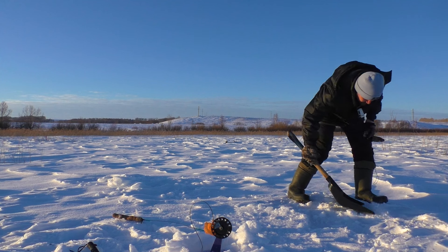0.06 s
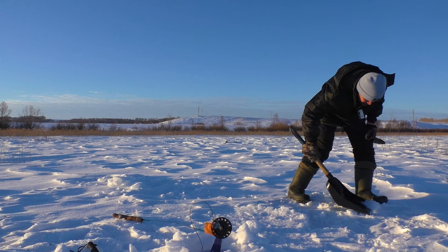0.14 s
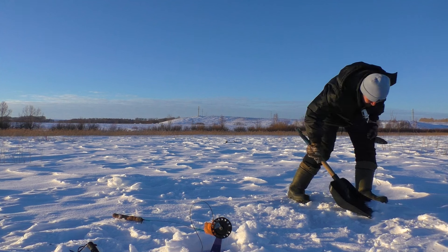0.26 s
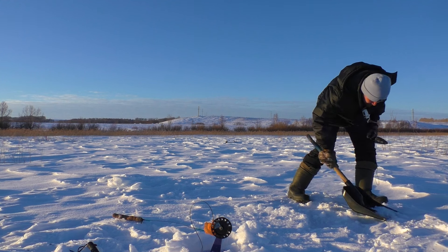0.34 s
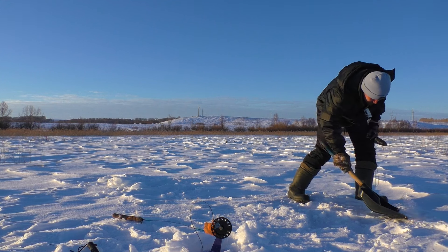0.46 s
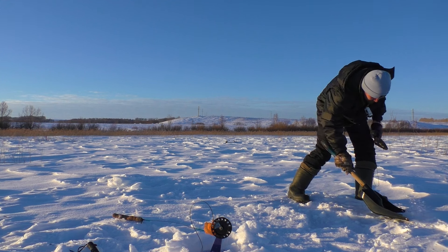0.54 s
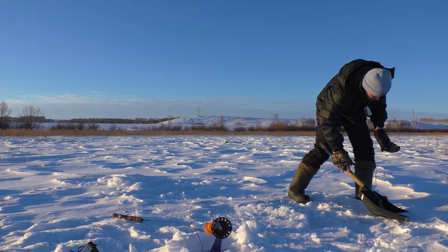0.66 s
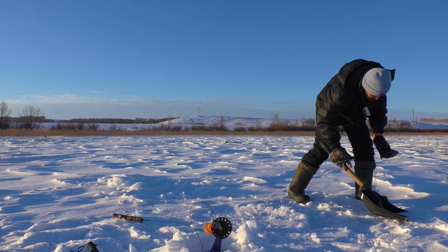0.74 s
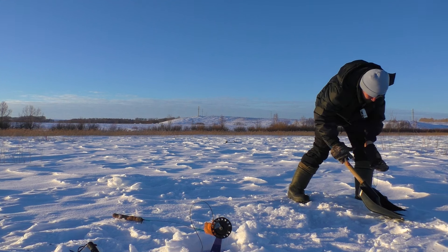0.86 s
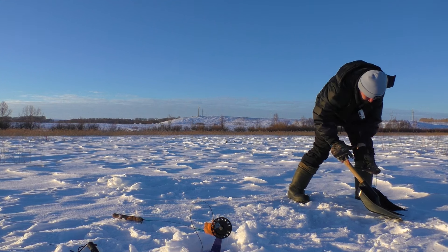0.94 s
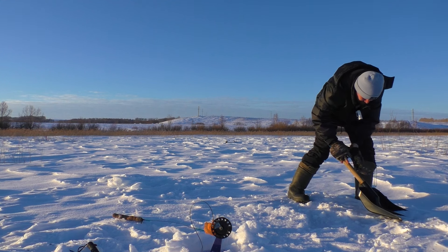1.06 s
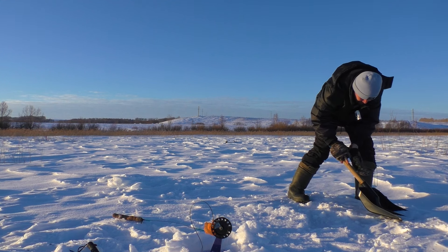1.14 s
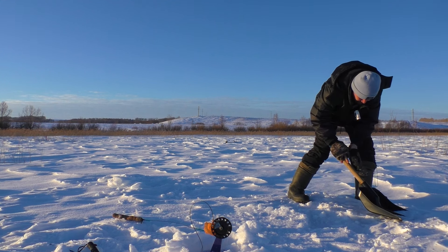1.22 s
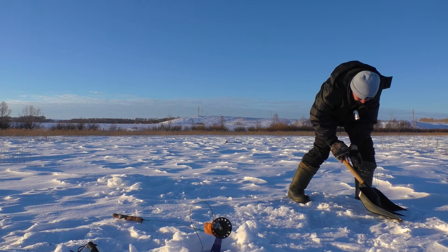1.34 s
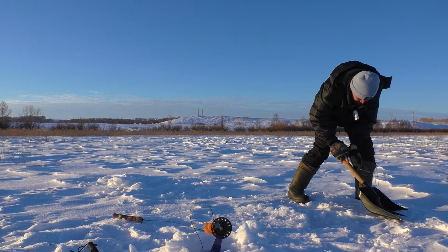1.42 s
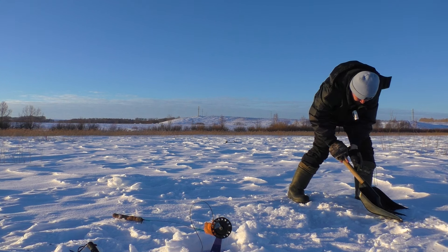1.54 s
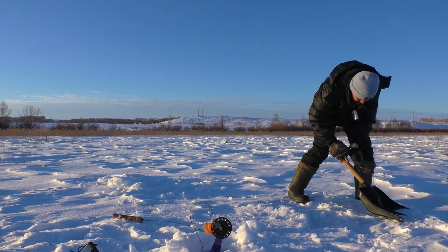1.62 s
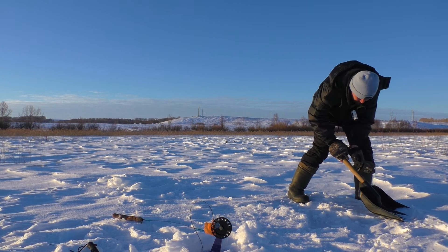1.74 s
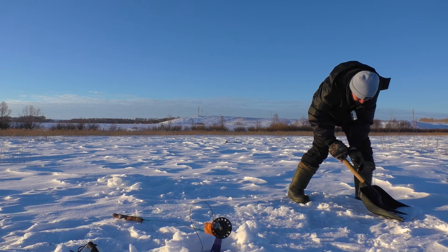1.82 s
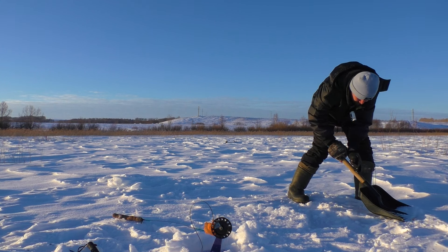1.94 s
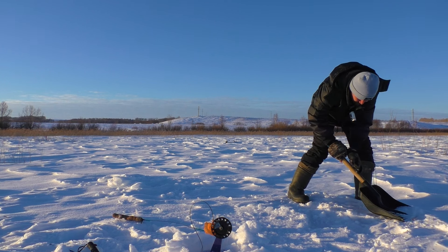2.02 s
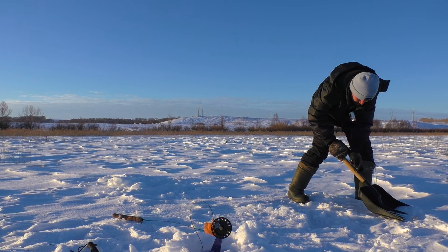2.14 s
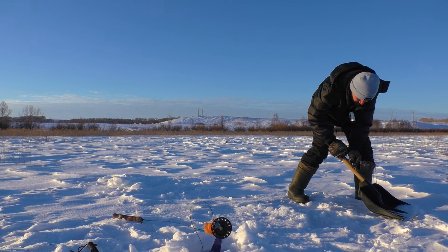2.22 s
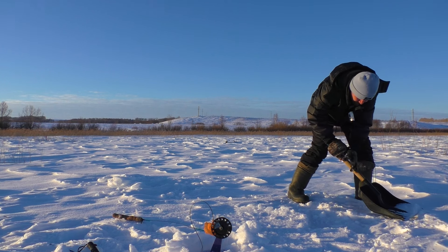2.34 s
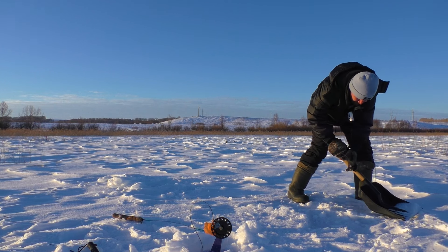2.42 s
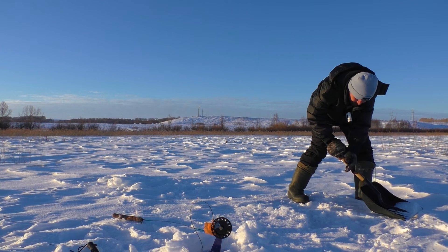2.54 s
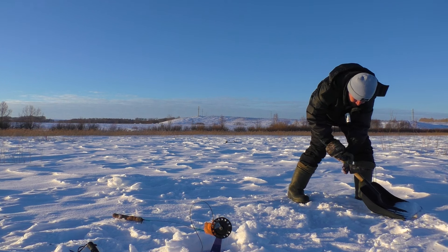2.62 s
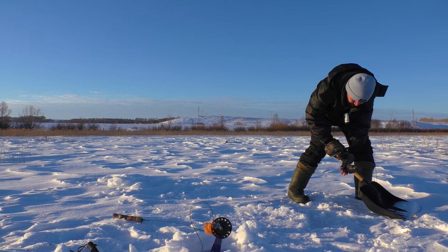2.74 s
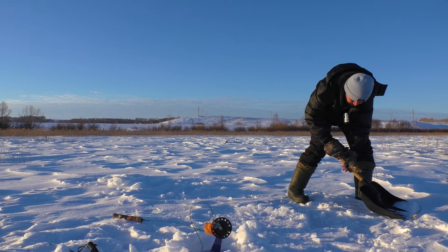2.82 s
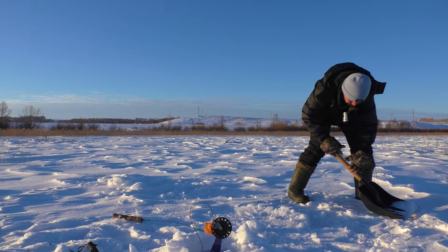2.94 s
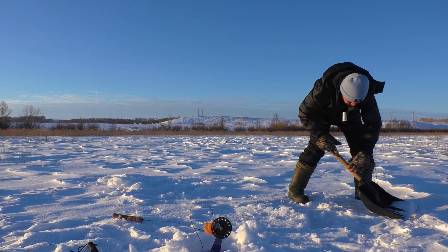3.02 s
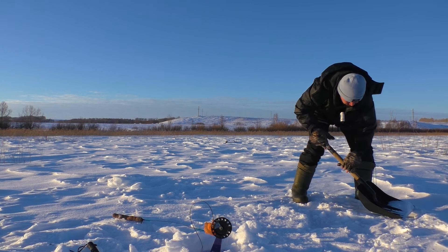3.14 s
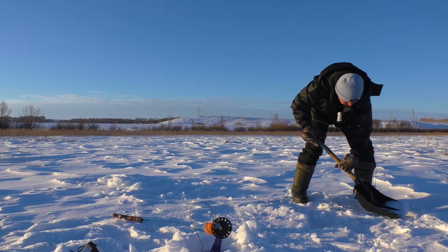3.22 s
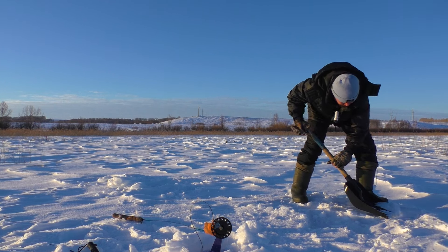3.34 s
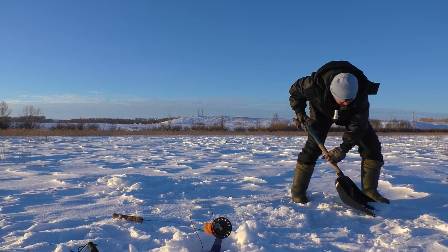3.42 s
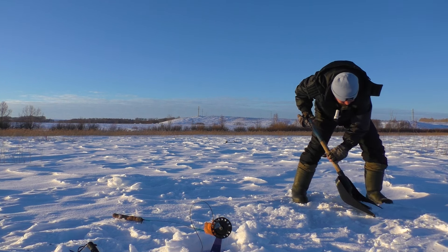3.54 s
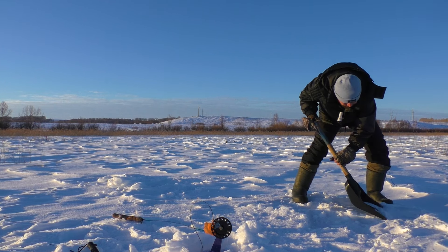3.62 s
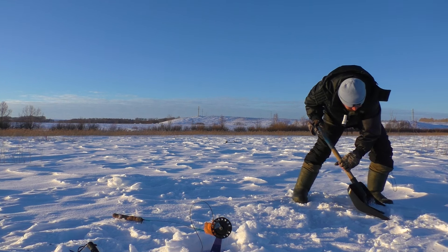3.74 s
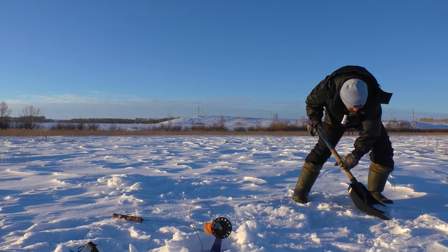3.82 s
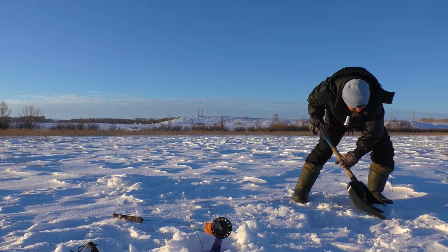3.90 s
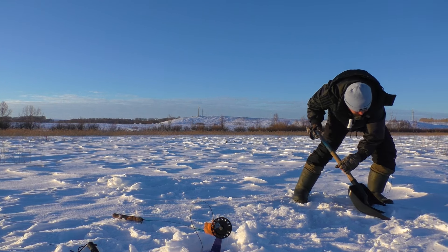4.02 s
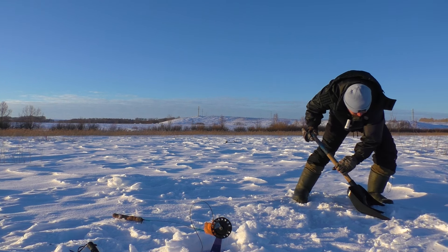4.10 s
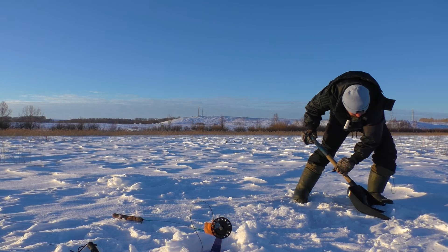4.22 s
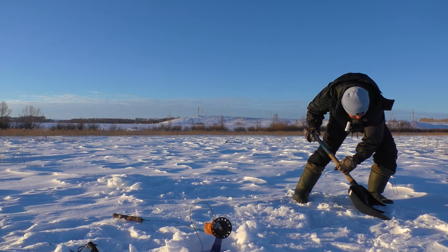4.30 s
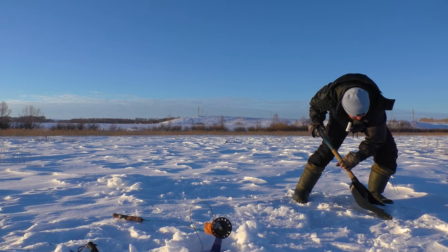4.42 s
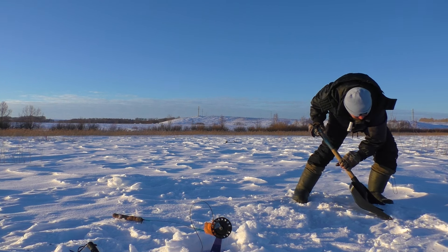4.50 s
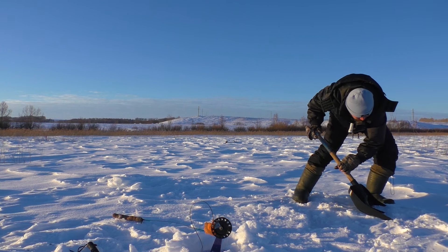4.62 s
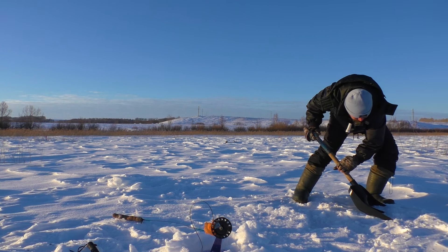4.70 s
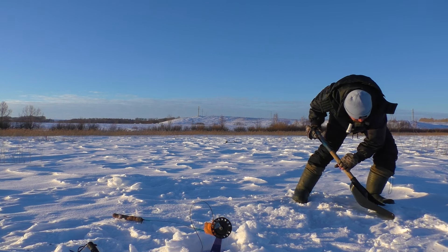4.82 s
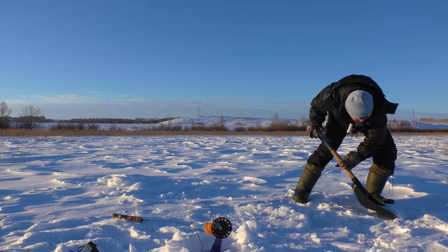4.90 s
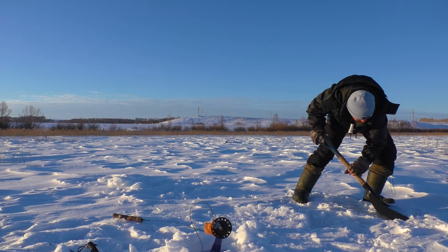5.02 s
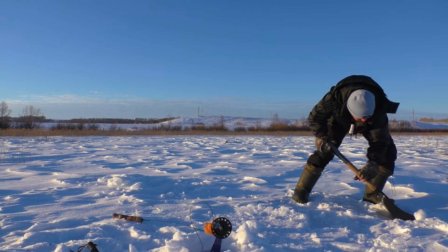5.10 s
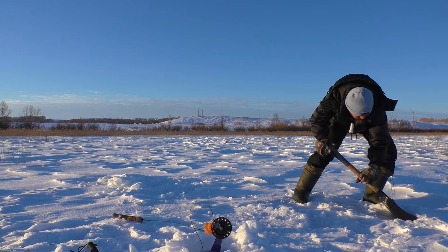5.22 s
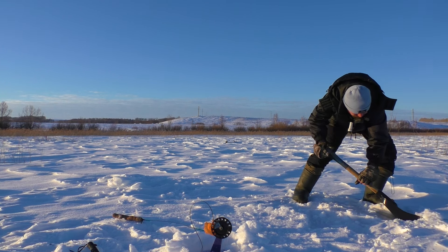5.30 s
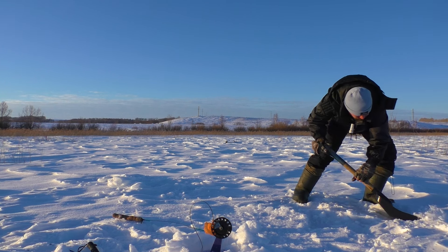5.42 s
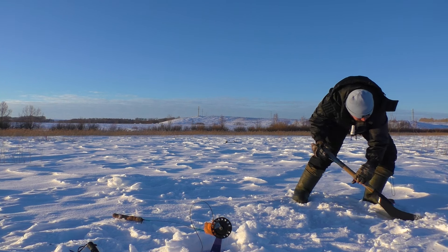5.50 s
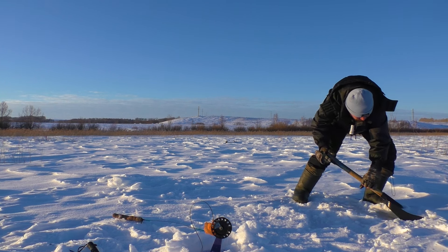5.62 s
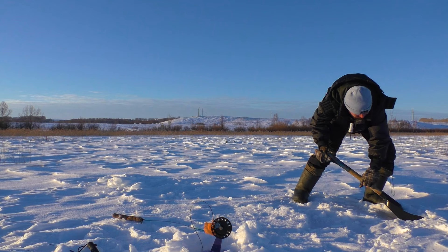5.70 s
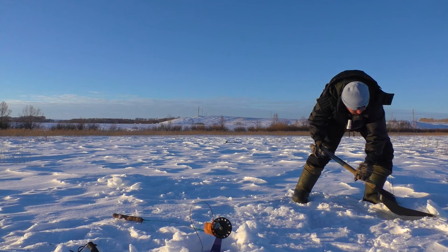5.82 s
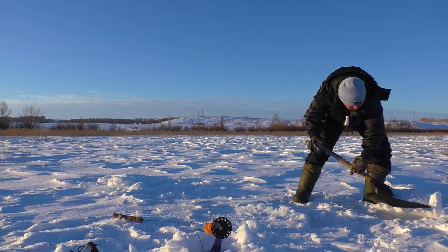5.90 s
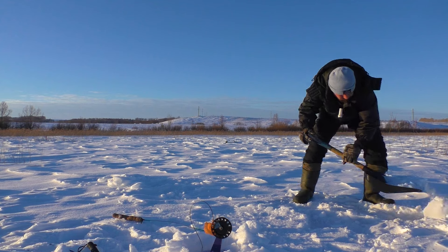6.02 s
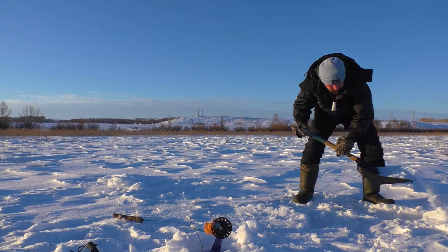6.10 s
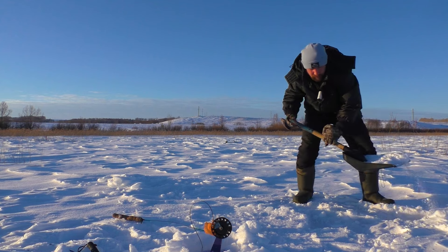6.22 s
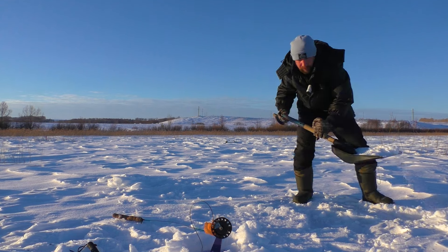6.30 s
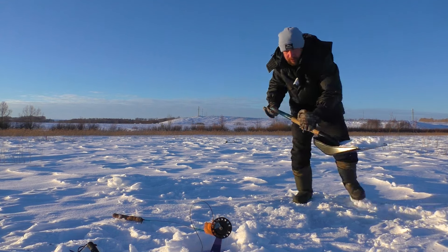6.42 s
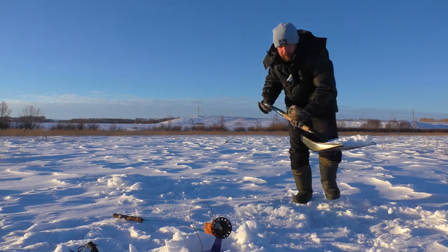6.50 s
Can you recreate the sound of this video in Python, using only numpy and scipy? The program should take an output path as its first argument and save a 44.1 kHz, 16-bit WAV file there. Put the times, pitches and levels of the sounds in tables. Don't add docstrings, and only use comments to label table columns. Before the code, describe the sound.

A shovel chops icy snow crust: hard jabs, a light dragging lull in gusty wind, then heavy irregular crunches and one bright knock on ice.

```python
import sys
import numpy as np
from scipy import signal
from scipy.fft import rfft, irfft
from scipy.io import wavfile
from scipy.ndimage import uniform_filter1d

SR = 44100
rng = np.random.default_rng(int(sys.argv[2]) if len(sys.argv) > 2 else 0)


def put_to_file(sound):
    columns = np.atleast_2d(sound).T
    safe = np.clip(columns, -1, 1)
    whole_steps = np.round(safe * 32767)
    wavfile.write(sys.argv[1], SR, whole_steps.astype(np.int16))


def volts_from_decibels(level):
    exponent = np.asarray(level, float) / 20
    return 10 ** exponent


N = 288987

# time_s, left_right_db
EDGE_PAN = [
    (0.0, -4.5),
    (0.53, -4),
    (0.88, 0.5),
    (2.94, 0.5),
    (3.26, -2),
    (3.67, 2),
    (5.64, 4),
    (5.89, 0),
    (6.55, -0.5),
]


def evened(x):
    return x / np.sqrt(np.mean(x ** 2) + 1e-20)


def read(points, hz):
    f, value = np.transpose(points)
    return np.interp(np.log(hz + 1), np.log(f + 1), value)


def curves(rows):
    s, *columns = np.transpose(rows)
    return [np.interp(np.arange(N) / SR, s, c) for c in columns]


def colour(x, points):
    hz = np.fft.rfftfreq(N, 1 / SR)
    octaves_below = np.maximum(np.log2(points[0][0] / (hz + 1)), 0)
    octaves_above = np.maximum(np.log2((hz + 1) / points[-1][0]), 0)
    gain_db = read(points, hz) - 27 * (octaves_below + octaves_above)
    return irfft(rfft(x) * volts_from_decibels(gain_db), N)


def resonate(x, hz, width):
    turn = np.exp(2j * np.pi * np.cumsum(hz * np.ones(x.shape[-1])) / SR)
    r = np.exp(-np.pi * width / SR)
    return 2 * (turn * signal.lfilter([1 - r], [1, -r], x / turn)).real


def clumps(ms):
    size = max(round(ms * SR / 1000), 2)
    once = uniform_filter1d(rng.standard_normal(N), size)
    return evened(uniform_filter1d(once, size))


def cracks(per_s, spread_db, clump_db):
    sign = rng.choice([-1., 1.], (2, N))
    size = sign * volts_from_decibels(spread_db * np.minimum(rng.exponential(1, (2, N)), 5))
    happens = rng.random((2, N)) < per_s / SR
    return evened(size * happens * volts_from_decibels(clump_db))


def slope(s, hold, rise_db_s, fall_db_s, t):
    return -rise_db_s * np.maximum(s - t, 0) - fall_db_s * np.maximum(t - s - hold, 0)


def ports(pair, pan_db):
    likeness = [(60, 1), (180, 1), (400, 1), (750, .82), (1650, 0.86), (4970, 0.86), (15000, 0.66)]  # freq_hz, left_right_likeness
    lead_angle = [(0, 0), (2330, 0.19), (3790, 0.45), (8100, 0.43), (9390, 0.52), (14800, 0.51),
                  (16500, 0.0)]
    tilt = [(60, 0.5), (380, -1), (2380, -0.5), (15000, 1.5)]  # freq_hz, left_right_db
    hz = np.fft.rfftfreq(N, 1 / SR)
    same = np.clip(read(likeness, hz), 0, 1)
    lead = np.exp(.5j * read(lead_angle, hz)) * volts_from_decibels(read(tilt, hz) / 2)
    mid = rfft(pair[0]) * np.sqrt((1 + same) / 2)
    side = rfft(pair[1]) * np.sqrt((1 - same) / 2)
    both = irfft(np.array([(mid + side) * lead, (mid - side) / lead]), N)
    return both * volts_from_decibels(np.outer([.5, -.5], pan_db))


def hiss():
    spectrum = [(300, 26.5), (2000, 25), (9000, -5), (13000, -12), (16000, -24)]  # freq_hz, density_db
    level_db = -47
    return volts_from_decibels(level_db) * evened(colour(rng.standard_normal((2, N)), spectrum))


def wind():
    spectrum = [(15, -2), (33, -2.5), (45, -2), (80, -7), (120, -12), (250, -39)]  # freq_hz, density_db
    # time_s, level_db
    gusts = [(.6, -44), (.88, -25.5), (1.17, -36), (1.26, -28.5), (1.39, -30), (1.8, -33.5), (2.0, -31),
             (2.24, -31), (3.3, -34), (3.47, -26), (3.94, -29), (4.65, -45), (3.05, -39), (5.25, -50),
             (6.0, -34), (6.33, -36), (5.67, -38)]
    calm_db, rise_db_s, fall_db_s = -43, 74, 110
    shared, apart = rng.standard_normal((2, N)) * volts_from_decibels(2.0 * clumps(69))
    apart = 0.4 * (apart - uniform_filter1d(apart, size=500))
    t = np.arange(N) / SR
    power = volts_from_decibels(2 * calm_db)
    power = power + sum(volts_from_decibels(2 * (db + slope(s, 0, rise_db_s, fall_db_s, t))) for s, db in gusts)
    pair = np.array([shared + apart, shared - apart])
    return np.sqrt(power) * evened(colour(pair, spectrum))


def jolts():
    # time_s, peak_db, centre_hz
    flakes = [(1.124, -32, 14000), (1.171, -24, 9000), (1.241, -19, 8100), (1.255, -33, 7000),
              (1.281, -35, 3000), (1.348, -28, 6500), (1.366, -30, 8500), (1.392, -25, 8000),
              (1.449, -21, 8100), (1.487, -27, 8500), (1.7235, -25, 13000), (2.4365, -28, 7600),
              (3.875, -16, 4500), (3.889, -20, 4800), (3.906, -19, 3700), (3.911, -26, 7000),
              (3.9385, -8, 6800), (3.9383, -25, 10500), (4.183, -13, 7000), (4.192, -11, 1500),
              (4.203, -13, 8000), (4.404, -7, 3400), (4.669, -11, 6500), (4.697, -14, 2900),
              (4.722, -10, 4000), (4.7548, -9, 7000), (5.3345, -13, 4500), (5.345, -29, 7800),
              (5.355, -13, 6000), (5.483, -16, 5000), (5.74, -31, 3500), (5.912, -21, 4000),
              (6.152, -30, 1200), (.075, -10, 8000), (.127, -12, 2500), (4.636, -11, 3000),
              (4.645, -8, 3300), (4.651, -10, 6000), (4.661, -10, 3500), (4.709, -9, 7300),
              (4.713, -11, 3400), (4.737, -11, 1200), (4.8, -10, 1400), (6.347, -21, 4000),
              (1.171, -31, 1500), (2.912, -29, 4000), (3.062, -22, 3000), (3.08, -27, 2500),
              (3.122, -20, 1200), (4.984, -18.5, 3370), (6.192, -26, 900), (6.208, -26, 1200),
              (6.273, -25, 1000), (6.29, -24, 800), (6.325, -22, 500), (6.344, -25, 600), (6.37, -27, 600),
              (6.382, -26, 1500), (6.469, -27, 3500)]
    # time_s, peak_db, pitch_hz
    thumps = [(0.13, -27, 143), (0.13, -18, 297), (0.37, -11, 472), (0.454, -11, 336), (1.44, -28, 305),
              (2.487, -26, 248), (3.066, -20, 237), (3.266, -23, 264), (3.49, -23, 564), (3.492, -6, 313),
              (3.548, -11.5, 469), (3.615, -10, 205), (3.673, -3.5, 342), (3.842, -12, 200),
              (3.916, -23, 260), (4.042, -21, 168), (4.083, -9, 168), (4.239, -2.5, 266), (4.28, -11, 355),
              (4.382, -5, 255), (4.635, -5.5, 188), (4.728, -15.5, 245), (4.797, -16, 321),
              (4.882, -23, 195), (5.041, -23, 304), (5.088, -5.5, 229), (5.35, -20, 432), (5.613, -17, 505),
              (5.833, -21, 287), (6.267, -26, 232)]
    flake_t60_s, flake_width = .007, .7
    thump_rise_s, thump_t60_s, thump_db = 0.0042, 0.092, -3.5
    out, t = np.zeros(N + SR), np.arange(4000) / SR
    t_flake = t[:600]
    flake_fade = volts_from_decibels(-60 * t_flake / flake_t60_s)
    for (s, db, hz), puff in zip(flakes, rng.standard_normal((len(flakes), 600))):
        burst = (puff + 2 * (t_flake == 0)) * flake_fade
        tick = resonate(resonate(burst, hz, flake_width * hz), hz, hz)
        out[round(s * SR):][:600] += volts_from_decibels(db) * tick / abs(tick).max()
    for s, db, hz in thumps:
        pair = np.sin(2 * np.pi * hz * t * (1 - 1.43 * t)) + 0.38 * np.sin(2 * np.pi * 1.37 * hz * t)
        envelope = volts_from_decibels(db + thump_db - 60 * t / thump_t60_s) * np.minimum(t / thump_rise_s, 1)
        out[round(s * SR):][:4000] += envelope * pair
    return out[:N]


def ice_knock(t):
    modes = [(320, 0, 0.033), (850, 0, .012), (1590, 10.5, 0.0095), (1950, 7, .009), (2400, 8, 0.011),
             (4000, 10.5, 0.0078), (4800, 9, 0.0097), (5500, 3, 0.024), (6240, -4, 0.026), (6860, -1, 0.03),
             (7800, -2, .008), (8985, -4, 0.024), (10500, -3, .009), (13500, -16, .009)]
    knock = sum(volts_from_decibels(db - 60 * t / t60) * np.sin(2 * np.pi * hz * t) for hz, db, t60 in modes)
    knock -= volts_from_decibels(16.0 - 60 * t / 0.0045) * np.sin(2 * np.pi * 3000 * t * (1 + 30 * t))
    return knock * np.minimum(t / 0.00061, 1)


def dry_click(t):
    x = 2 * np.pi * 5500 * t
    return np.exp(-x) * x * np.e - .12 * np.exp(-t / .0008)


def snaps():
    # time_s, peak_db, centre_hz, thud_above_snap_db
    bright_snaps = [(1.1721, -28, 2080, 1), (1.274, -25, 2270, -9), (1.725, -27, 6600, -20),
                    (1.767, -24.5, 4700, -14), (2.280, -23, 2400, -25), (3.069, -11, 9000, -17),
                    (3.5642, -9.5, 2730, -8), (3.8524, -11.5, 2540, -24), (4.2055, -9, 2310, -25),
                    (4.754, -9, 2630, -3), (4.7995, -5, 4800, -13), (4.817, -9.5, 3900, -27),
                    (4.828, -10.5, 3580, -26), (5.3541, -11.5, 2530, -5), (5.3685, -15, 2500, -33),
                    (5.3801, -15, 3140, -26), (5.483, -18, 3580, -26), (6.3463, -15.5, 2090, -23)]
    # time_s, peak_db, centre_hz, thud_above_snap_db
    dull_snaps = [
        (0.107, -13, 700, -11),
        (0.132, -6, 1030, -3),
        (0.783, -25, 595, -9),
        (1.339, -28, 895, 0),
        (1.47, -25, 834, -12),
        (6.235, -20.5, 635, -31),
        (6.312, -17, 646, -10),
    ]
    lumps = bright_snaps + dull_snaps
    out, t = np.zeros(N + SR), np.arange(1500) / SR
    for (s, peak_db, hz, thud_db), puff in zip(lumps, rng.standard_normal((len(lumps), 1500))):
        burst = 0.47 * puff * volts_from_decibels(-60 * t / 0.0082) + (t == 0)
        tick = resonate(resonate(burst, hz, .7 * hz), hz, 1.4 * hz)
        tick = tick + .5 * resonate(resonate(burst, .3 * hz, 2 * hz), .3 * hz, 2 * hz)
        thud = np.sin(2 * np.pi * 320 * t) * volts_from_decibels(thud_db - 60 * t / 0.02) * np.minimum(t / 0.0023, 1)
        out[round(s * SR):][:1500] += volts_from_decibels(peak_db + 3.5) * (tick / abs(tick).max() + thud)
    knock_s, knock_db, click_s, click_db = 5.8337, -5.5, 2.4915, -11
    out[round(knock_s * SR):][:1500] += volts_from_decibels(knock_db - 13.0) * ice_knock(t)
    out[round(click_s * SR):][:1500] += volts_from_decibels(click_db) * dry_click(t)
    out = out[:N] + jolts()
    return ports(np.array([out, .5 * np.roll(out, shift=9)]), curves(EDGE_PAN)[0])


def blade(jerk, low_db, high_db):
    low_modes = [(170.4, 60, 1), (225.2, 36.4, 1.5), (272, 88, -1), (332.3, 52, -0.5), (400, 97, -2.5),
                 (460, 60, -4), (526, 48, -2)]
    high_modes = [(670, 320, -1.5), (795, 208, 5.5), (923, 100, 4.5), (1062, 203, 2), (1236, 270, -7),
                  (1473, 210, -1.5)]
    # time_s, pitch_hz
    grip = [(0, 312), (.41, 400), (1, 307), (3.4, 274), (3.56, 420), (3.76, 288), (4.05, 174), (4.2, 307),
            (4.4, 333), (4.64, 202), (4.8, 290), (5.1, 260), (5.66, 420), (5.96, 208), (6.3, 295),
            (6.55, 250)]
    grip_hz = curves(grip)[0]
    out = np.zeros((2, N))
    for modes, level_db, per_s, favour in (low_modes, low_db, 900, 7.0), (high_modes, high_db, 1500, 0):
        shared, force = cracks(per_s, 3.47, 1.0 * jerk), volts_from_decibels(level_db)
        shares = np.array([volts_from_decibels(db - favour * abs(np.log2(hz / grip_hz))) for hz, width, db in modes])
        shares /= np.linalg.norm(shares, axis=0)
        rings = np.zeros((2, N))
        for (hz, width, db), share in zip(modes, shares):
            own = 1.19 * cracks(per_s, 4.2, 1.8 * jerk)
            push = force * share * (shared + own)
            rings += resonate(resonate(push, hz, 3 * width), hz, width)
        out += evened(rings) * np.sqrt(np.mean(force ** 2))
    return ports(out, np.zeros(N))


def chips():
    rattle = rng.standard_normal(130) * signal.windows.hann(130)
    total = np.zeros((2, N))
    for hz in np.geomspace(1700, 9500, 9):
        hits = signal.oaconvolve(cracks(90, 3.2, 0), rattle[None], axes=1)[:, :N]
        total += resonate(hits, hz, 0.4 * hz) / np.sqrt(hz)
    return evened(total)


def patched(x):
    z = signal.stft(x, nperseg=256)[2]
    field = rng.standard_normal(z.shape[1:])
    for _ in range(2):
        field = uniform_filter1d(field, size=4, axis=0)
        field = uniform_filter1d(field, size=7, axis=1)
    patch_db = 2 * evened(field)
    return evened(signal.istft(z * volts_from_decibels(patch_db), nperseg=256)[1][:, :N])


def judder(force_db):
    slips_per_s, hard_db = 190, -24.5
    turns = np.cumsum(slips_per_s * volts_from_decibels(4.0 * clumps(6))) / SR
    size = volts_from_decibels(3.4 * np.minimum(rng.exponential(1, N), 4))
    kicks = -np.diff(np.floor(turns), prepend=0) * size
    kicks = evened(resonate(kicks, 1710, 2400))
    kicks -= uniform_filter1d(kicks, size=80)
    level_db = -7.5 + .5 * np.minimum(force_db - hard_db, 0)
    return volts_from_decibels(level_db) * np.array([kicks, .3 * np.roll(kicks, shift=7)])


def grit(jerk, force_db, powder_db):
    crystal_spectrum = [(1350, -3), (1550, -5.5), (1800, -9.5), (2150, -2.5), (2700, -2.5), (3600, -2.5),
                        (5000, -5), (6000, -8), (7000, -13.5)]
    powder_spectrum = [(5000, -11.5), (6000, -2), (8000, 0.5), (10500, -5.5), (13000, -17.5), (16000, -30)]  # freq_hz, density_db
    dust_spectrum = [(10000, -4), (12500, -4), (14500, -1.5), (16000, -9)]  # freq_hz, density_db
    # start_s, length_s, pitch_hz, width_hz, level_above_crystals_db
    songs = [(0, 0.088, 2810, 252, -3), (0.44, 0.1, 4480, 400, -7), (0.49, 0.16, 4000, 1200, -2.5),
             (1.202, 0.044, 2190, 300, 2), (1.375, 0.26, 2210, 350, -7.5), (2.64, 0.11, 3830, 800, 0.5),
             (5.253, 0.045, 6500, 1500, -2), (3.734, 0.046, 3720, 500, -0.5), (4.086, 0.12, 1080, 338, -2),
             (5.89, 0.26, 960, 400, -1), (4.062, 0.068, 3750, 600, -3.5), (4.1, 0.07, 2450, 600, 0),
             (5.1, .08, 950, 300, -2), (0, .07, 1000, 300, -1), (4.26, 0.033, 3730, 500, 1.5),
             (4.347, 0.083, 3560, 594, 5.5), (5.095, 0.097, 2760, 330, 0.5), (5.876, 0.033, 7500, 900, -1),
             (5.198, 0.052, 6630, 900, -6), (5.205, 0.096, 3320, 400, -11), (3.628, .06, 5700, 700, -6.5),
             (3.638, 0.049, 3280, 500, -4.5), (3.66, .04, 2500, 400, -3), (3.759, 0.032, 870, 149, -2),
             (4.37, 0.056, 890, 150, -0.5), (4.07, 0.066, 7300, 900, -7), (6.464, 0.096, 1900, 330, -2.5),
             (6.465, 0.077, 4000, 900, -3.5)]
    train = cracks(9000, 1.5, 0.79 * jerk + 0.5 * clumps(2.1))
    body = patched(evened(evened(colour(train, crystal_spectrum)) + 0.52 * chips()))
    for s, length, hz, width, db in songs:
        part = slice(round(s * SR), round((s + length) * SR))
        ring = evened(resonate(resonate(train[:, part], hz, 1.3 * width), hz, 3 * width))
        body[:, part] += volts_from_decibels(db) * ring * signal.windows.tukey(ring.shape[1], .5)
    fizz = patched(colour(train + 0.61 * cracks(8000, 6.4, 4.6 * jerk), powder_spectrum))
    dust_db = -54.5 + 0.43 * (force_db + powder_db + 47.5)
    dust = volts_from_decibels(dust_db) * evened(colour(train, dust_spectrum))
    crunch = volts_from_decibels(force_db) * (body + judder(force_db) + volts_from_decibels(powder_db) * fizz)
    return ports(crunch + dust, curves(EDGE_PAN)[0])


def effort():
    # time_s, crystals_db, blade_db, powder_above_crystals_db
    drag = [(0.0, -38, -35, -9), (0.853, -42.5, -41, -1), (1.047, -39, -36, -2.5),
            (1.24, -50.5, -48.5, -0.5), (1.76, -48.5, -48.5, 2.5), (2.16, -44, -41.5, -5),
            (2.61, -42, -40, -6), (2.852, -48, -44.5, -9), (3.16, -36, -35.5, -7),
            (3.959, -37.5, -36.5, -14), (4.36, -30.5, -37.5, -2), (4.542, -44.5, -44.5, -8),
            (4.992, -54, -50, -10), (5.394, -33, -38, -7), (5.809, -40.5, -38, -10), (6.351, -41, -54, -19),
            (6.479, -53.5, -58.0, 5.5), (6.55, -40, -30.5, -30)]
    # full_force_s, hold_s, crystals_db, blade_db, powder_above_crystals_db
    shoves = [(0.285, 0.0092, -34.5, -36, -6), (0.363, 0.042, -24.0, -25, -5.5),
              (1.136, 0.042, -57, -40, -9), (1.941, 0.05, -34, -36, -12), (2.443, 0.018, -43, -35.5, 3),
              (2.657, 0.052, -38.5, -45, -2.5), (3.324, 0.029, -26, -40, -28),
              (3.729, 0.054, -22.5, -18.5, -4), (4.086, 0.13, -21.5, -23, -6),
              (4.406, 0.043, -26, -35.5, -1.5), (4.582, 0.03, -40, -42, -3),
              (4.868, 0.036, -32.5, -37.5, -4.5), (5.051, 0.15, -26.5, -28.5, -7),
              (5.55, 0.036, -33.5, -34, 5), (5.6, 0.099, -27, -31, -4), (5.895, 0.011, -34.5, -55.5, -1.5),
              (6.049, 0.072, -38, -39.5, -5)]
    # start_s, hold_s, crystals_db, blade_db, powder_above_crystals_db
    slides = [(0.499, 0.086, -42.5, -59, 7), (0.91, 0.064, -35, -44, -8), (2.25, 0.081, -56, -48, 10),
              (3.161, 0.017, -43, -32.5, 1), (3.972, 0.0066, -42, -37, -2), (4.229, 0.035, -30, -44, -4),
              (5.203, 0.026, -22, -22.5, -8.5), (5.36, 0.023, -31, -44, -23),
              (5.948, 0.039, -38, -31, -5.5), (6.16, 0.065, -42, -36.5, -4),
              (6.471, 0.058, -43, -39.5, -17)]
    # start_s, hold_s, crystals_db, blade_db
    hard_jabs = [(0.0, 0.06, -21.5, -19), (0.103, 0.012, -35, -24), (.14, .017, -34.5, -30),
                 (0.129, 0.0045, -27.5, -16), (0.201, 0.012, -35, -30), (0.39, 0.031, -54, -15),
                 (0.458, 0.022, -19.5, -27.5), (3.493, 0.014, -26.5, -16.5), (3.548, 0.012, -23.5, -22),
                 (3.609, 0.016, -31.5, -27.5), (3.637, 0.03, -25, -26.5), (3.67, 0.035, -28, -18.5),
                 (3.84, 0.011, -25.5, -16.5), (3.905, 0.019, -35, -23.5), (4.048, 0.094, -45, -25),
                 (4.233, 0.012, -43, -17), (4.281, 0.005, -32, -20.5), (4.368, 0.037, -37, -19),
                 (4.635, 0.0023, -21, -27), (4.644, 0.023, -23, -27), (4.681, 0.017, -30, -25),
                 (4.707, 0.031, -24.5, -37), (4.727, 0.0027, -34, -20), (4.755, 0.011, -25.5, -39),
                 (4.796, 0.0024, -26.5, -18), (4.82, 0.007, -25, -27.5), (5.088, 0.067, -32.5, -15),
                 (5.297, 0.033, -31.5, -27.5), (5.402, 0.0045, -45.5, -25), (5.678, 0.022, -46, -24.5),
                 (6.317, 0.013, -41.5, -26.5)]
    # start_s, hold_s, crystals_db, blade_db
    light_nudges = [(.435, .015, -36, -40), (.085, .02, -35, -36), (0.653, 0.019, -40, -50),
                    (0.844, 0.047, -41, -44), (1.237, 0.0052, -45, -41), (1.386, 0.028, -44, -36),
                    (1.434, 0.075, -46.5, -40), (1.59, 0.004, -52, -34), (1.659, 0.0049, -43, -38),
                    (1.84, 0.072, -42, -39), (2.07, 0.0089, -42.5, -43), (2.414, 0.0091, -61, -46),
                    (3.052, 0.015, -41, -41), (3.276, 0.005, -39, -29.5), (3.425, 0.16, -37.5, -51),
                    (3.59, .03, -38, -34), (4.473, 0.017, -37.5, -35), (5.35, 0.003, -41, -16),
                    (6.273, 0.02, -44.5, -32), (6.372, 0.0086, -49, -31)]
    # start_s, hold_s, depth_db
    catches = [
        (0.416, 0.004, 5.5),
        (1.2, 0.029, 5),
        (2.175, 0.056, 6.5),
        (3.819, 0.021, 9),
        (4.205, 0.025, 8),
        (4.837, 0.005, 3),
        (5.319, 0.0078, 13.5),
        (5.349, 0.017, 14.5),
        (5.737, 0.047, 7.5),
        (6.112, 0.023, 7.5),
    ]
    # start_s, hold_s, depth_db
    skips = [(.079, .02, -8), (0.158, .014, 7), (0.41, .012, 11.5), (0.485, 0.0046, 3.5), (2.833, .06, 3.5),
             (3.508, .02, 1), (3.862, 0.0069, 5), (4.188, 0.0033, 4), (4.196, .004, 5), (4.374, 0.0027, 9),
             (4.466, .006, 3.5), (4.655, .002, 6), (4.716, .003, 6), (4.669, .006, 8.5), (4.703, .003, 4),
             (4.74, 0.0097, 5.5), (4.765, 0.0099, 7), (4.804, .007, -2), (4.838, .012, 6),
             (4.899, 0.018, 9.5), (5.313, .01, 3)]
    t = np.arange(0, N / SR + .002, .001)
    s, crystals_db, blade_db, powder_db = np.transpose(drag)
    levels = (crystals_db, blade_db, crystals_db + powder_db)
    power = np.array([volts_from_decibels(2 * np.interp(t, s, db)) for db in levels])
    jabs = [(*row, -4.5) for row in hard_jabs]
    nudges = [(*row, -4.5) for row in light_nudges]
    quicker = np.array([[1.16], [1], [1.16]])
    for rows, rise, fall in (shoves, 307, 640), (slides, 400, 171), (jabs, 1900, 693), (nudges, 900, 693):
        for s, hold, crystals_db, blade_db, powder_db in rows:
            full_db = np.array([[crystals_db], [blade_db], [crystals_db + powder_db]])
            power += volts_from_decibels(2 * (full_db + slope(s, hold, rise, fall * quicker, t)))
    stall_db = sum(np.maximum(db + slope(s, hold, 700, 700, t), 0) for s, hold, db in catches)
    skip_db = sum(np.maximum(db + slope(s, hold, 4000, 1500, t), 0) for s, hold, db in skips)
    net_db = 10 * np.log10(power) - stall_db - np.outer([1, .3, 1], skip_db)
    return [np.interp(np.arange(N) / SR, t, db) for db in net_db]


def scene():
    jerk = evened(clumps(4.0) + .5 * clumps(8.6))
    crystals_db, blade_db, powder_db = effort()
    upper_share = 0.55
    upper_db = -3 + upper_share * crystals_db + (1 - upper_share) * blade_db
    background = hiss() + wind()
    shovel = snaps() + blade(jerk, blade_db, upper_db)
    return background + shovel + grit(jerk, crystals_db, powder_db - crystals_db)


def roll_off(x):
    return signal.sosfilt(signal.butter(12, 16000, fs=SR, output="sos"), x)


def record(dry):
    limited = 0.81 * np.tanh(dry / 0.87)
    edge = signal.firwin(511, 15850, window=("kaiser", 7), fs=SR)[None]
    narrower = signal.convolve(edge, signal.firwin(21, 15000, fs=SR)[None])
    recent = signal.lfilter([1 / SR], [1, 1 / SR - 1], (limited ** 2).mean(0))
    lost = np.clip((10 * np.log10(recent + 1e-9) + 24.5) / 2, 0, .8)
    full = signal.oaconvolve(limited, edge, "same")
    dulled = signal.oaconvolve(limited, narrower, "same")
    return roll_off((1 - lost) * full + lost * dulled)


dry = scene()
out = record(dry)
put_to_file(out)
```